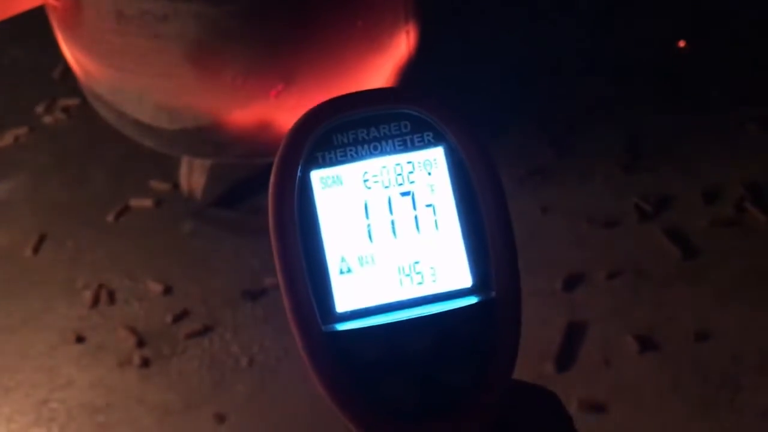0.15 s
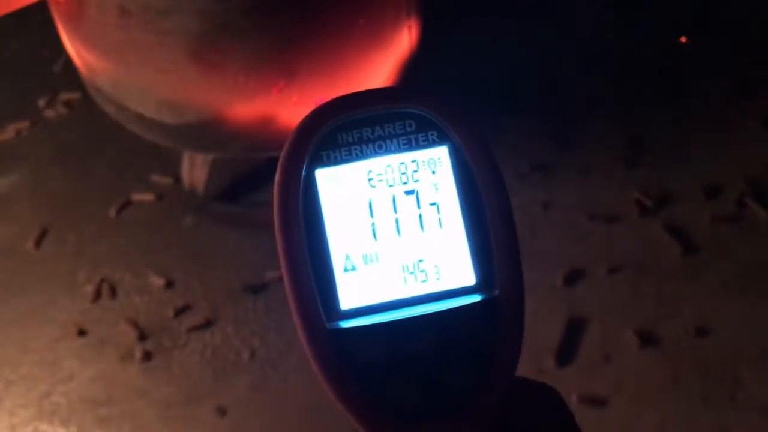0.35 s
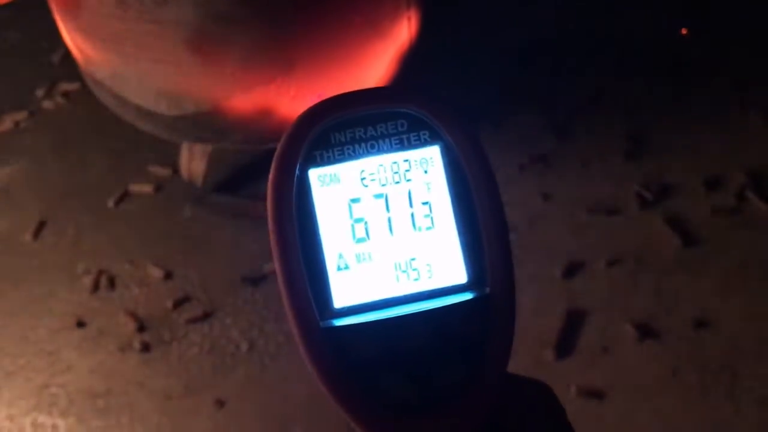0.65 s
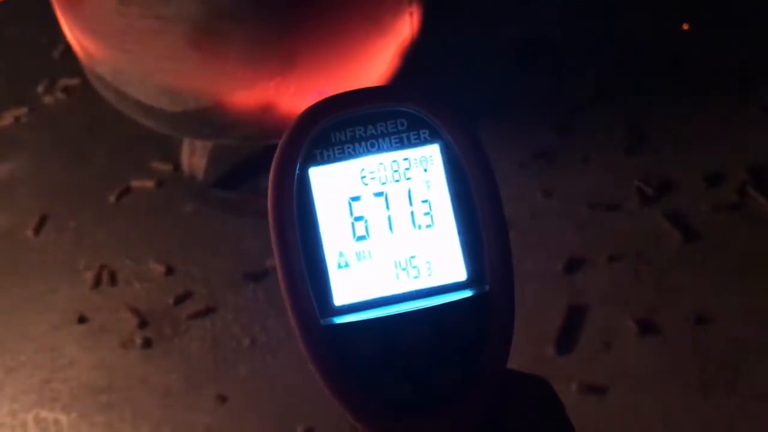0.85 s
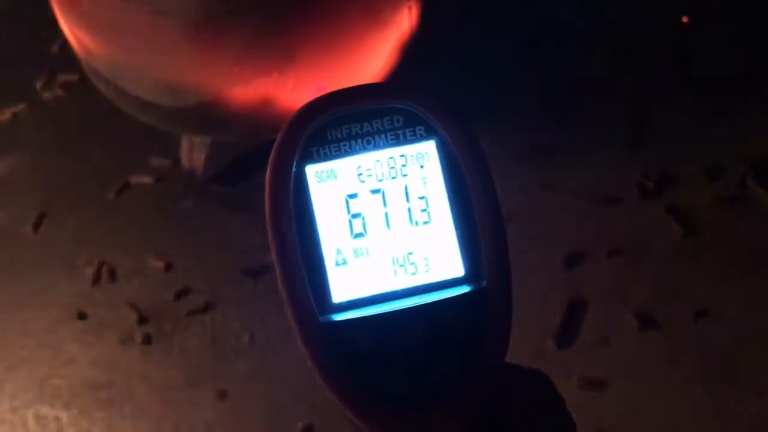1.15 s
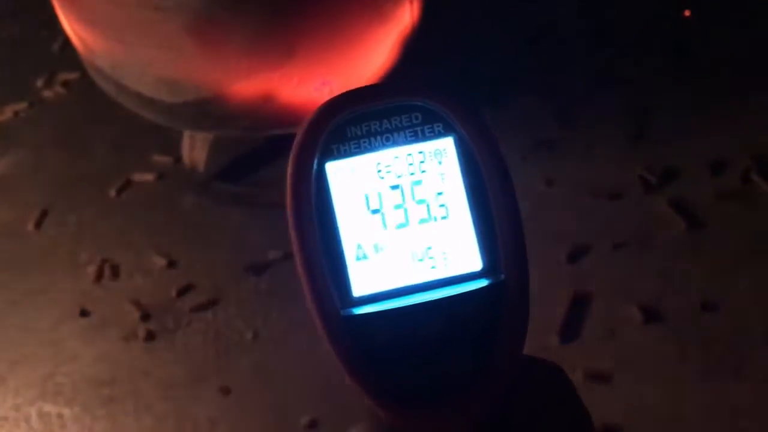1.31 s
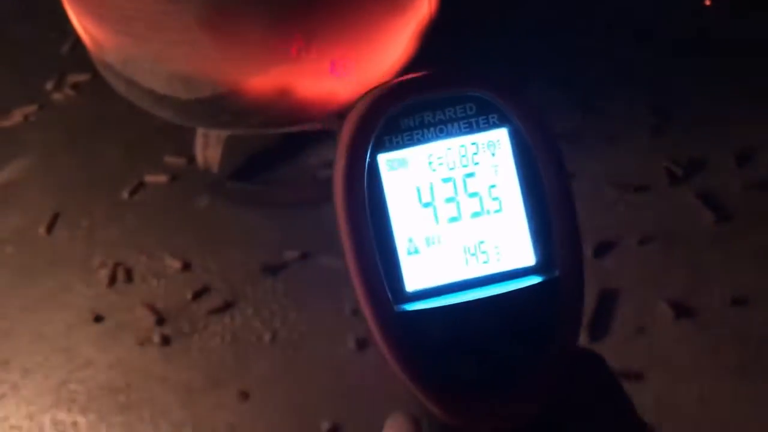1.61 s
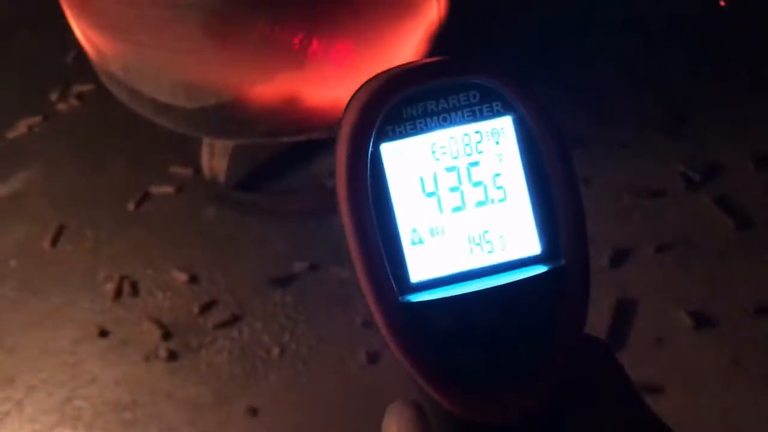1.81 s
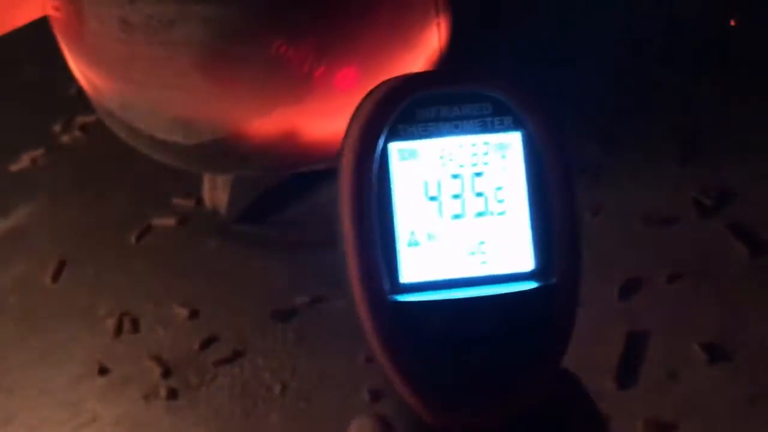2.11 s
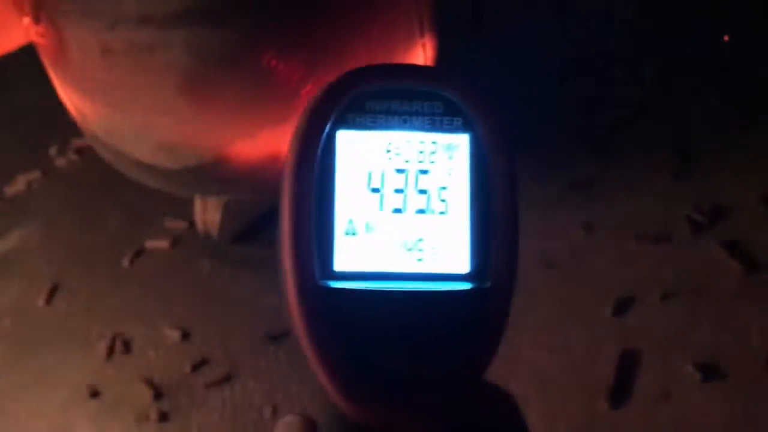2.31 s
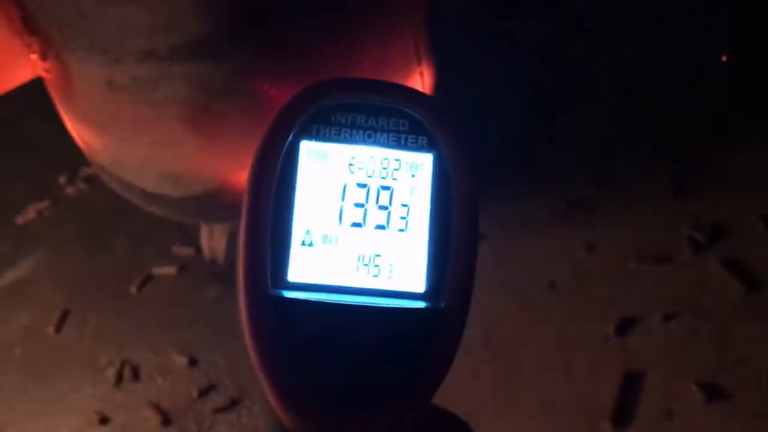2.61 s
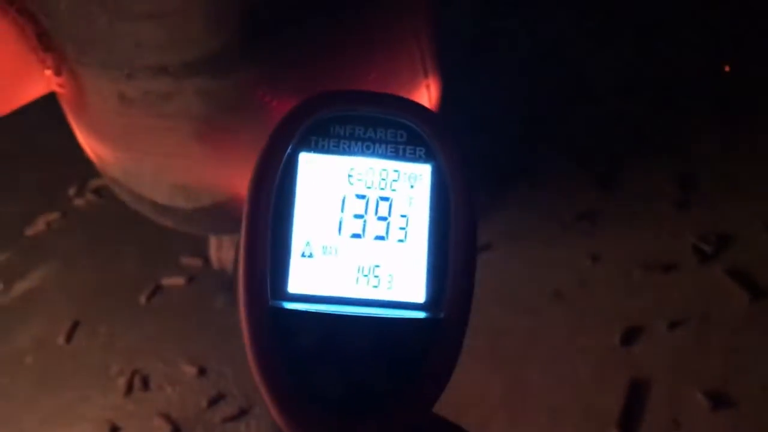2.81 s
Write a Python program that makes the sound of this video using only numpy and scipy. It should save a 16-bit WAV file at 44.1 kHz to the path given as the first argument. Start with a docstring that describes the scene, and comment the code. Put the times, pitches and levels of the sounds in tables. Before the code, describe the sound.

A forced-air burner roars steadily up close, with deep fluttering flame rumble and airy hiss.

```python
"""A low flame rumble with brief surges: a forced-air burner running flat out, heard from close by.
Flame, air roar and hiss are noise shaped by spectra in dB; slow curves and random flutter set their levels.
The air blast roars in the burner pot and hisses with a faint flutter.
The blower's motor adds a thin whine of sines, split by the mains supply into a cluster of lines."""
import sys
import numpy as np
from scipy import signal
from scipy.fft import rfft, irfft
from scipy.io import wavfile
from scipy.ndimage import uniform_filter1d

SR = 44100
rng = np.random.default_rng(int(sys.argv[2]) if len(sys.argv) > 2 else 0)


def inscribe(sig):
    """Save sig as 16-bit PCM at rate SR to the path in sys.argv[1].

    A 1-D sig is mono; a 2-D sig holds one channel per row.
    Samples are clipped to [-1, 1] before scaling.
    """
    pcm = np.round(np.clip(np.atleast_2d(sig).T, -1, 1) * 32767)
    wavfile.write(sys.argv[1], SR, pcm.astype(np.int16))


N = 130095
T = np.arange(N) / SR  # s
FREQS = np.fft.rfftfreq(N, 1 / SR)  # Hz

# flame rumble colour: frequency_hz, relative_density_db
RUMBLE_COLOUR = [(15, -60), (25, -40), (32, -14), (40, -10), (52, -4.5), (68, -1), (88, -1), (115, -1.5),
                 (150, -4.5), (178, -4.5), (220, -11), (280, -18.5), (380, -26), (600, -41.5), (1500, -83)]
# level of the deepest rumble: time_s, gain_db
BILLOW_CURVE = [(0, -4), (.28, -9), (.38, -8), (.55, 3), (.72, -13), (.88, -1), (1.13, 0), (1.25, 1.5),
                (1.4, -2), (1.62, -7), (1.74, 11), (1.85, -3), (2.02, 5), (2.14, -5), (2.4, -2), (2.62, 4),
                (2.77, -11), (2.95, 3)]
# flame surges and lulls: centre_s, width_s (full, where the dB gain is at 1/e), gain_db
FLAME_SURGES = [(.11, .06, 3.5), (.26, .1, -2.5), (.39, .11, 5.5), (.6, .14, -2.5), (.725, .06, 5.5),
                (.94, .06, -2.5), (1.033, .065, 7.5), (1.22, .08, -1.5), (1.42, .06, 4.5), (1.6, .12, 3),
                (1.98, .1, -1.5), (2.46, .12, 5.5), (2.69, .04, 3), (2.83, .09, 3.5)]
# level of the rumble above the core: time_s, gain_db
FRINGE_CURVE = [(0, 3.5), (.11, -1.5), (.22, 0), (.35, -1), (.57, -0.5), (.8, 1.5), (1.1, -1.5),
                (1.31, 1.5), (1.55, 1.5), (1.8, 0), (1.98, 1), (2.25, .5), (2.6, .5), (2.95, -4)]
# air blast in the pot: frequency_hz, relative_density_db
ROAR_COLOUR = [(150, -10), (380, -12.5), (470, -10.5), (600, -6), (700, -2), (760, -4.5), (820, -1),
               (930, -0.5), (1100, -2), (1280, -9), (1380, -10), (1550, -15), (1720, -12), (1920, -11),
               (2250, -17), (2550, -25), (4000, -51)]
# resonances of pot and air pipe: centre_hz, width_hz, lift_db
PIPE_RESONANCES = [(423, 13, 5.5), (504, 29, 4), (1239, 33, 8), (1306, 14, 8.5)]
# level of roar and hiss: time_s, gain_db
AIR_CURVE = [(0, 0), (.5, 0), (1.1, -.1), (1.45, .5), (1.75, 0.5), (2.2, .5), (2.6, -0.43), (2.95, -0.5)]
# air jet hiss: frequency_hz, relative_density_db
HISS_COLOUR = [(1200, -35), (2300, -10.5), (2600, -6), (2920, 1.5), (3200, 1), (3550, -3), (3880, 0.5),
               (4300, -2.5), (4600, -2), (4880, -5.5), (5100, -5), (5700, -5.5), (7250, -7), (7600, -12),
               (8300, -6.5), (9200, -9.5), (9900, -10.5), (10450, -16.5), (11300, -12.5), (12600, -15.5),
               (14000, -16.5), (15700, -20.5)]
# blower whine fundamental: time_s, pitch_hz
WHINE_PITCH = [(0, 4248), (.5, 4248.5), (1.1, 4251), (1.5, 4255), (2.1, 4258), (2.95, 4259)]
# whine lines: harmonic_number, mains_sideband_number
WHINE_LINES = [(1, -2), (1, -1), (1, 0), (1, 1), (1, 2), (1, 3), (2, -1), (2, 0), (3, 0)]
# rms level of each whine line: level_db
WHINE_LEVELS_DB = [-57, -54, -55, -55.5, -60.5, -56.5, -65, -60, -64]

RUMBLE_DB, ROAR_DB, HISS_DB = -18, -25, -37
BILLOW_TOP_HZ, CORE_TOP_HZ = 60, 142  # crossovers: deep | core | fringe
LEVELLING_S = .06  # averaging time for levelling each rumble band before its level curve
ROAR_FLUTTER_RMS_DB, ROAR_FLUTTER_HZ = 1.0, (8, 60.6)
HISS_FLUTTER_RMS_DB, HISS_FLUTTER_HZ = .42, (6, 120)
EDDY_RMS_DB, EDDY_S, EDDY_HZ = .9, .016, 700  # depth, duration, bandwidth
STFT_SIZE, STFT_HOP = 256, 64  # samples
MAINS_PULSE_HZ = 120
WHINE_WAVER_RMS_DB, WHINE_WAVER_HZ = 1.6, (.4, 3.3)
WHINE_SWELL_DB_PER_S = .5  # times harmonic number: upper lines come forward faster
LOW_CUT_HZ, BAND_EDGE_HZ = 34, 15720


def amp(db):
    """Decibels to gain."""
    return 10 ** (np.asarray(db) / 20)


def unit(x):
    """Scales to rms 1."""
    return x / np.sqrt(np.mean(x ** 2) + 1e-20)


def spectrum(points):
    """Joins (Hz, dB) points on a log-frequency axis."""
    hz, db = np.transpose(points)
    return np.interp(np.log(FREQS + 1), np.log(hz), db)


def curve(points):
    """Joins (s, value) points in time."""
    return np.interp(T, *np.transpose(points))


def noise(colour_db):
    """Random noise of the given colour, rms 1."""
    return unit(irfft(rfft(rng.standard_normal(N)) * amp(colour_db), N))


def wander(low_hz, high_hz):
    """Random motion, rms 1, cut off below low_hz, rolled off around high_hz, stronger at the slow end."""
    slow_tilt = (FREQS > low_hz) / np.sqrt(FREQS + low_hz)
    weight = slow_tilt / (1 + (FREQS / high_hz) ** 2)
    return unit(irfft(rfft(rng.standard_normal(N)) * weight, N))


def below(x, hz):
    """The part of x under a steep crossover."""
    return irfft(rfft(x) / (1 + (FREQS / hz) ** 10), N)


def levelled(x):
    """Flattens the short-term level of x, keeping its long-term level."""
    power = uniform_filter1d(x ** 2, size=max(int(LEVELLING_S * SR), 1))
    return np.std(x) * unit(x / np.sqrt(abs(power) + 1e-12))


def flame():
    """Turbulent combustion noise: billowing deep part, core with brief surges and lulls, upper fringe."""
    rumble = noise(spectrum(RUMBLE_COLOUR))
    deep = below(rumble, BILLOW_TOP_HZ)
    deep_and_core = below(rumble, CORE_TOP_HZ)
    core = deep_and_core - deep
    fringe = rumble - deep_and_core

    surge_db = np.zeros(N)
    for centre_s, width_s, gain_db in FLAME_SURGES:
        surge_db += gain_db * np.exp(-(2 * (T - centre_s) / width_s) ** 2)

    mix = levelled(deep) * amp(curve(BILLOW_CURVE))
    mix += levelled(core) * amp(surge_db)
    mix += levelled(fringe) * amp(curve(FRINGE_CURVE))
    return amp(RUMBLE_DB) * mix


def roar():
    """Turbulent air blast, coloured by the resonances of the hollow pot and pipe."""
    ring_db = np.zeros(len(FREQS))
    for centre_hz, width_hz, lift_db in PIPE_RESONANCES:
        ring_db += lift_db / (1 + (2 * (FREQS - centre_hz) / width_hz) ** 2)
    flutter_db = ROAR_FLUTTER_RMS_DB * wander(*ROAR_FLUTTER_HZ)
    blast = noise(spectrum(ROAR_COLOUR) + ring_db)
    return blast * amp(ROAR_DB + curve(AIR_CURVE) + flutter_db)


def eddies(x):
    """Eddies in the jet: lifts and lowers small random patches of time and pitch."""
    overlap = STFT_SIZE - STFT_HOP
    z = signal.stft(x, nperseg=STFT_SIZE, noverlap=overlap)[2]
    patch_bins = max(round(EDDY_HZ * STFT_SIZE / SR), 1)
    patch_frames = max(round(EDDY_S * SR / STFT_HOP), 1)
    patches = uniform_filter1d(rng.standard_normal(z.shape), patch_bins, axis=0)
    patches = unit(uniform_filter1d(patches, patch_frames, axis=1))
    grainy = signal.istft(z * amp(EDDY_RMS_DB * patches), nperseg=STFT_SIZE, noverlap=overlap)[1]
    return unit(grainy[:N])


def hiss():
    """Air jet noise, grainy with eddies and fluttering faintly."""
    flutter_db = HISS_FLUTTER_RMS_DB * wander(*HISS_FLUTTER_HZ)
    jet = eddies(noise(spectrum(HISS_COLOUR)))
    return jet * amp(HISS_DB + curve(AIR_CURVE) + flutter_db)


def whine():
    """Motor harmonics with mains sidebands, each line wavering in level."""
    turns = np.cumsum(curve(WHINE_PITCH)) / SR  # cycles of the fundamental
    out = np.zeros(N)
    for (harmonic, sideband), level_db in zip(WHINE_LINES, WHINE_LEVELS_DB):
        cycles = harmonic * turns + sideband * MAINS_PULSE_HZ * T + rng.random()
        drift_db = WHINE_WAVER_RMS_DB * wander(*WHINE_WAVER_HZ)
        drift_db += WHINE_SWELL_DB_PER_S * harmonic * T
        out += amp(level_db) * unit(np.sin(2 * np.pi * cycles) * amp(drift_db))
    return out


def scene():
    """Flame, air and motor together, one channel."""
    return (flame() + roar() + hiss() + whine())[None]


def record(dry):
    """The microphone's low cut and the recorder's band limit."""
    low_cut = signal.butter(N=6, Wn=LOW_CUT_HZ, btype="high", fs=SR, output="sos")
    thinned = signal.sosfilt(low_cut, dry)
    taps = signal.firwin(801, BAND_EDGE_HZ, window=("kaiser", 9), fs=SR)
    return signal.oaconvolve(thinned, taps[None], "same")


dry = scene()
out = record(dry)
inscribe(out)
```